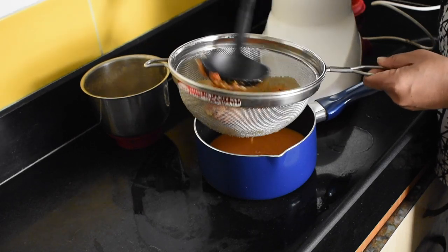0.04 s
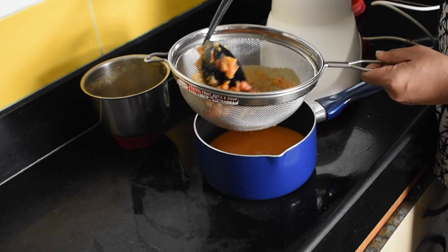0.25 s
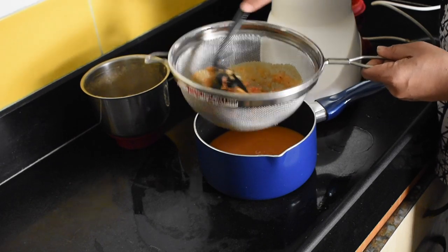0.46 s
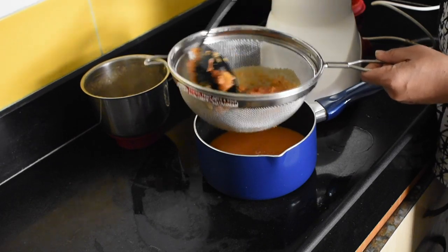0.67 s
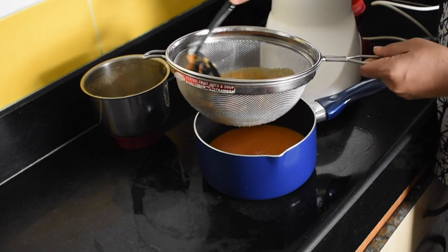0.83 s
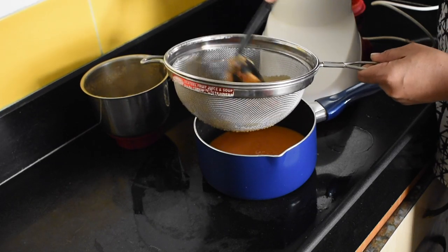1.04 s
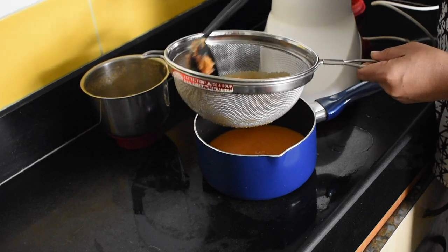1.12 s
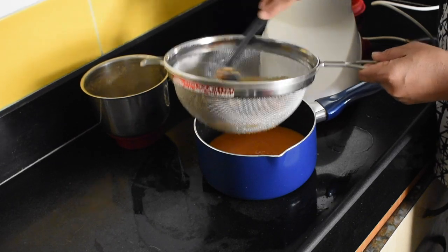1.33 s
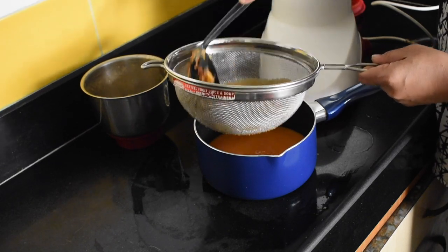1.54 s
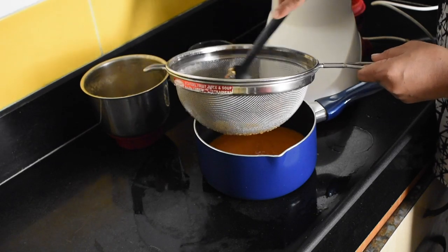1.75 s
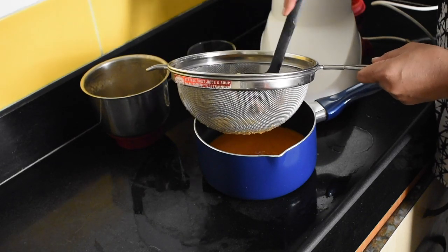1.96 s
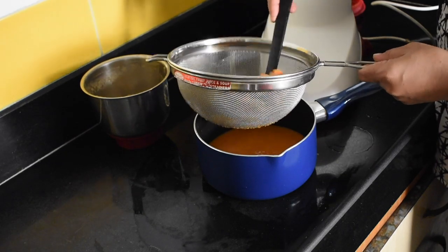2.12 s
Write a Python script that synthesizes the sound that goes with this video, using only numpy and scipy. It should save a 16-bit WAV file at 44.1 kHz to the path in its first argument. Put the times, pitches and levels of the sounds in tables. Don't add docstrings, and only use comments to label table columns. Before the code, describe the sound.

Spatula scraping a steel mesh strainer, heard close in a tiled kitchen. A knock, wet smack and hollow pan hum open it, fading by 0.2 s. A hard rasp comes at 0.55 s, a light drag near 0.8, a firm tick and scrape at 1.05, a bright scrape at 1.4, then nearly continuous rubbing from 1.75, easing by 2.2. Rough metallic tones, faint air and fridge hum.

```python
import sys
import numpy as np
from scipy import signal
from scipy.fft import rfft, irfft, next_fast_len
from scipy.io import wavfile
from scipy.ndimage import uniform_filter1d, map_coordinates

SR = 44100
rng = np.random.default_rng(int(sys.argv[2]) if len(sys.argv) > 2 else 0)


def boost_factor(decibels):
    exponent = np.asarray(decibels, float) / 20
    return 10 ** exponent


def transcribe(u):
    v = np.clip(np.atleast_2d(u).T, -1, 1)
    q = np.round(v * 32767).astype(np.int16)
    wavfile.write(sys.argv[1], SR, q)


N = 96402
CONTACT_RISE_S = .0007


def unit(x):
    return x / np.sqrt(np.mean(x ** 2) + 1e-20)


def along(points, hz):
    f, value = np.transpose(points)
    return np.interp(np.log(hz + 1), np.log(f + 1), value)


def wobble(rate):
    knots = rng.standard_normal(int(N * rate / SR) + 4)
    return map_coordinates(knots, [np.arange(N) * rate / SR])


def filtered(x, response):
    m = next_fast_len(N + SR // 2)
    return irfft(rfft(x, m) * response(np.fft.rfftfreq(m, 1 / SR)), m)[..., :N]


def modes(peaks, f):
    total = 0
    for k, (hz, width, db) in enumerate(peaks):
        damping = 1j * f * width
        total = total + (-1) ** k * boost_factor(db) * damping / (hz * hz - f * f + damping + 1e-9)
    return total


def patchy(x, patchy_db):
    z = signal.stft(x, nperseg=256)[2]
    field = uniform_filter1d(rng.standard_normal(z.shape), size=5, axis=0)
    field = uniform_filter1d(field, size=8, axis=1)
    return signal.istft(z * boost_factor(patchy_db * unit(field)), nperseg=256)[1][:N]


# f/Hz, level/dB per Hz
AIR = [(15, -26), (60, -24), (160, -18), (300, -6.5), (700, -5), (1900, -4), (2700, -12), (15800, -26.5)]
# f/Hz, level/dB
HUM = [(100, -80.5), (200, -77.5), (399, -68)]


def background():
    air_db, air_swell_db, air_patchy_db = -54.5, .5, .8
    hum_width_hz, hum_swell_db, hum_drift_rad = 12, 2.2, .8
    air = filtered(rng.standard_normal(N), lambda f: boost_factor(along(AIR, f)))
    air = unit(patchy(air, air_patchy_db))
    t = np.arange(N) / SR
    hum = np.zeros(N)
    for hz, db in HUM:
        level = boost_factor(db + hum_swell_db * wobble(hum_width_hz))
        phase = 2 * np.pi * hz * t + hum_drift_rad * wobble(hum_width_hz)
        hum += level * np.sqrt(2) * np.sin(phase)
    return boost_factor(air_db + air_swell_db * wobble(2.6)) * air + hum


# f/Hz, t60/s
KITCHEN = [(300, 0.48), (2000, 0.38), (6000, 0.11), (14000, 0.16)]


def kitchen(x):
    hz, t, z = signal.stft(rng.standard_normal(SR // 2), SR, nperseg=256)
    decay = boost_factor(-60 * t / along(KITCHEN, hz)[:, None])
    tail = signal.istft(z * decay, SR, nperseg=256)[1]
    delayed = np.pad(x, (200, 0))
    return signal.fftconvolve(delayed, tail / np.linalg.norm(tail))[:N]


def thump():
    hz, width_hz, level_db, rise_s, t60 = 270, 92, -44, 0.077, 0.38
    t = np.arange(N) / SR
    hollow = unit(filtered(rng.standard_normal(N), lambda f: modes([(hz, width_hz, 0)], f) ** 2))
    return boost_factor(level_db - 60 * t / t60) * (1 - np.exp(-t / rise_s)) * hollow


# t/s, peak level/dB, centre f/Hz, t60/s
SMACKS = [(.026, -33, 10900, 0.016), (0.036, -25, 11800, 0.025), (.225, -46, 9700, 0.036),
          (.487, -39, 8000, 0.16), (.525, -41, 13000, .03), (0.62, -20, 8600, 0.035),
          (0.762, -42, 4400, 0.031), (0.821, -40.5, 11100, 0.05), (.975, -46.5, 4950, 0.071),
          (.983, -42, 11000, .04), (1.019, -34.5, 4350, 0.04), (1.018, -35, 10100, 0.045),
          (1.068, -30.5, 2440, .03), (1.101, -23, 1910, 0.021), (1.242, -49, 7000, 0.061),
          (1.301, -44.5, 12000, 0.046), (1.545, -36, 9700, 0.035), (1.624, -48, 14100, .03),
          (1.639, -32, 10600, 0.05), (1.531, -35.5, 6800, 0.083), (2.032, -28, 2120, 0.06)]


def smacks():
    level_db, width, top_hz = -9.5, 0.77, 14500
    out, t = np.zeros(N + SR), np.arange(SR // 8) / SR
    f = np.fft.rfftfreq(len(t), 1 / SR) + 1
    for s, db, hz, t60 in SMACKS:
        band = np.exp(-(np.log(f / hz) / width) ** 2) / (1 + (f / top_hz) ** 20)
        burst = unit(irfft(rfft(rng.standard_normal(len(t))) * band, len(t)))
        envelope = boost_factor(db + level_db - 60 * t / t60) * (1 - np.exp(-t / CONTACT_RISE_S))
        out[round(s * SR):][:len(t)] += envelope * burst
    return out[:N]


# f/Hz, width/Hz, level/dB
TAP = [(1020, 230, -7), (1890, 190, 4.5), (3470, 420, -3.5), (5330, 260, -5)]


def knock():
    start_s, level_db, t60 = .0357, -32, 0.038
    out, t = np.zeros(N), np.arange(SR // 8) / SR
    ring = unit(filtered(rng.standard_normal(N), lambda f: modes(TAP, f)))[:len(t)]
    out[round(start_s * SR):][:len(t)] += boost_factor(level_db - 60 * t / t60) * ring
    return out


# t/s, peak level/dB
TICKS = [
    (.759, -44.5),
    (.976, -52),
    (1.019, -37),
    (1.066, -43),
]
# f/Hz, level/dB, t60/s
STEEL = [(2970, -5, .04), (3600, -17, 0.032), (4160, -8, .04), (4610, 0.5, 0.031), (5440, -10, .05)]


def ticks():
    out, t = np.zeros(N + SR), np.arange(SR // 10) / SR
    for s, db in TICKS:
        ring = np.zeros(len(t))
        for hz, level, t60 in STEEL:
            ring += boost_factor(level - 60 * t / t60) * np.sin(2 * np.pi * (hz * t + rng.random()))
        out[round(s * SR):][:len(t)] += boost_factor(db) * (1 - np.exp(-t / CONTACT_RISE_S)) * ring
    return out[:N]


# t/s, length/s, f/Hz, level/dB
SINGS = [(0.534, 0.039, 1590, -38.8), (0.534, 0.046, 710, -39), (0.564, 0.086, 710, -42.5),
         (0.576, 0.11, 1690, -44.5), (0.581, 0.037, 4220, -42), (0.584, 0.057, 1430, -40),
         (0.584, 0.096, 4110, -49), (0.589, 0.041, 4930, -45), (0.594, 0.061, 1800, -36.5),
         (0.594, 0.055, 3450, -43), (0.594, 0.065, 2760, -43.5), (0.601, 0.068, 3550, -45.4),
         (1.053, 0.075, 1890, -39), (1.058, 0.053, 2940, -44), (1.065, 0.041, 1680, -37.5),
         (1.065, 0.068, 5510, -49), (1.078, 0.041, 3050, -49), (1.085, 0.064, 2700, -45),
         (1.399, 0.059, 4630, -45), (1.399, 0.07, 5180, -49.3), (1.402, 0.085, 1600, -38.5),
         (1.404, 0.031, 1800, -36.5), (1.417, 0.041, 1010, -39.5), (1.419, 0.056, 5070, -46),
         (1.424, 0.059, 4710, -44), (1.424, 0.064, 4110, -40.5), (1.429, 0.075, 4010, -49),
         (1.432, 0.07, 2720, -43.5), (1.442, 0.059, 720, -39), (1.457, 0.066, 1480, -43),
         (1.462, 0.022, 3040, -42), (1.462, 0.031, 1810, -37), (1.768, 0.046, 870, -39.5),
         (1.768, 0.13, 2760, -46.5), (1.778, 0.049, 1420, -38.9), (1.788, 0.029, 990, -35),
         (1.796, 0.069, 1810, -39.7), (1.801, 0.096, 710, -40), (1.816, 0.14, 2350, -46.5),
         (1.818, 0.03, 1690, -37), (1.823, 0.075, 1840, -47), (1.883, 0.044, 1480, -44),
         (2.013, 0.074, 2130, -49), (2.015, 0.036, 710, -40), (2.028, 0.089, 2000, -42.8),
         (2.058, 0.098, 1990, -48),
         (.685, 0.039, 850, -51.5), (0.816, 0.049, 1340, -50), (0.913, 0.056, 1320, -53),
              (1.1, 0.034, 714, -44.5), (1.477, 0.029, 728, -38), (1.891, 0.08, 704, -47),
              (2.013, 0.093, 292.3, -57), (2.033, 0.067, 1000, -44.5), (1.065, 0.0094, 1860, -38.5)]


def singing():
    level_db, flutter_db, flutter_per_s = -1.5, 3.5, 130
    edge_share = 0.4
    drift_rad = 1.05
    out, t = np.zeros(N + SR), np.arange(SR // 5) / SR
    flutter, drift = wobble(flutter_per_s), wobble(flutter_per_s)
    for s, length, hz, db in SINGS:
        u = rng.random()
        start = int(u * (N - len(t)))
        take = slice(start, start + len(t))
        edge = np.clip(np.minimum(t, length - t) / (edge_share * length), 0, 1)
        phase = 2 * np.pi * (hz * t + u) + drift_rad * np.cbrt(hz / 1e3) * drift[take]
        level = boost_factor(db + level_db + flutter_db * flutter[take])
        out[round(s * SR):][:len(t)] += level * np.sin(edge * np.pi / 2) * np.sqrt(2) * np.sin(phase)
    return out[:N]


def catches():
    per_s, spread_db, shudder_db, shudder_per_s = 14000, 1.6, 1, 160
    snap = rng.random(N) < per_s / SR
    size = rng.standard_normal(N) * boost_factor(spread_db * rng.exponential(size=N))
    return unit(snap * size * boost_factor(shudder_db * wobble(shudder_per_s)))


# t/s, pressure level/dB, slide speed as hiss over bowl/dB, fine wires favoured/dB
EARLY = [
    [(-.02, -43, -13, -1), (.03, -54.5, 0, -3.5), (.038, -44.5, 1.5, -8), (.056, -54, -1.5, -1),
     (.12, -60, -5, -6), (.2, -75, 5, 5)],
    [(.526, -60, 15, -10), (.541, -31.5, -15.5, 5), (.553, -34.5, -8.5, -3), (.572, -46.5, -4, -1),
     (.595, -32.5, -1, -2), (.615, -37, 3, -2), (.645, -42.5, 2.5, 3), (.672, -55.5, 7, -4.5),
     (.75, -64.5, 2.5, -4.5)],
    [(.74, -53.5, -6.5, 2), (.8, -50.5, -13, 1), (.83, -54, -12, -3), (.9, -54.5, -18, 0),
     (.99, -53, -8.5, 5), (1.025, -56, -1, 1)],
    [(1.015, -47, -4, 0), (1.034, -39, -18, 4), (1.056, -37, -10.5, -1), (1.066, -39, -6, 0),
     (1.069, -32.5, -7, -2.5), (1.1, -39.5, -0.5, -5.5), (1.125, -42.5, -3, -4), (1.2, -77.5, 11, -13),
     (1.27, -72, 2, -7)],
]
# t/s, pressure level/dB, slide
# speed as hiss over bowl/dB, fine wires favoured/dB
LATE = [
    [(1.382, -75, 9, 1), (1.397, -45, 9, 0.5), (1.408, -40.5, 3.5, 10.5), (1.413, -35, -2, 1),
     (1.445, -34.5, -1.5, -1.5), (1.478, -35, -3.5, -5), (1.51, -51, 3, -5), (1.55, -64.5, 7.5, -8.5),
     (1.6, -72.5, 13, -2)],
    [(1.6, -62.5, 2, -5), (1.7, -55, -8, 1.5), (1.752, -46.5, -7.5, 1.5), (1.782, -35, -3, -3),
     (1.806, -29.5, -9, -1), (1.835, -37, -2, 1), (1.865, -37.5, -5.5, -1)],
    [(1.865, -38, -6, 2), (1.9, -38, -5.5, -1.5), (1.93, -38.5, -3.5, -3), (1.97, -46, -1.5, -4.5),
     (2.0, -40.5, -6, -6.5)],
    [(2.0, -48, 8, 8), (2.016, -40.5, -3, -2.5), (2.034, -34.5, -6, 4), (2.05, -42.5, 2.5, -1.5),
     (2.09, -43, -2, -1), (2.166, -50, -6.5, -1), (2.19, -56, 6.5, -4.5)],
]
# favoured bowl f/Hz, lift/dB, blade note f/Hz, lift/dB, belly lift/dB
BLADE = [(1000, 1, 1300, 1.5, 3), (645, 1.5, 1450, -0.5, 5), (820, -1, 1380, 8, -6), (780, 1, 2210, 7, -13),
         (983, 9, 2000, 2.5, -3), (990, 6.5, 1400, 5, -17), (670, -5, 2200, 4, 3.5), (716, 9, 2380, 19, 0)]
# f/Hz, width/Hz, level/dB
BOWL = [(355, 54, -10.5), (510.4, 26.4, -7), (596, 62, -7.5), (729, 85, -1.5), (870, 11.7, -1.5),
        (1015, 31, 2), (1182, 73, -10.5), (1420, 26, 2.5), (1604, 39, -1.5), (1648, 24, -4),
        (1770, 70, -3.5), (1976, 68, 1.5), (2283, 50, -17), (2720, 36, -3)]
# f/Hz, level/dB per Hz
DULL = [(120, -106), (200, -9.5), (356, -22), (692, 5), (1280, 6.5), (1840, 7.5), (2160, -7), (4000, -74),
        (5200, -110), (8800, -120)]
# f/Hz, level/dB per Hz
MESH = [(1290, -63), (2200, -5), (3760, -2), (4080, -2.5), (5680, -5), (8370, -3.5), (13800, -10.5),
        (15800, -22)]
# f/Hz, width/Hz, level/dB
WIRES = [(4133, 16.7, -32), (4540, 37, 27), (4767, 53, -13), (5390, 30, 29)]


def scraping():
    bowl_level_db, dull_level_db, wires_db = -3, -7, -13
    wander_db, patchy_db = 2, 1.5
    touch_s, damped_hz = .012, 32
    belly_hz, fine_hz = 372, 6300
    bearing_octaves = 0.18
    t, out = np.arange(N) / SR, np.zeros(N)
    damped = [(hz, max(width, damped_hz), db) for hz, width, db in BOWL]

    def near(f, hz):
        return np.exp(-(np.log2((f + 1) / hz) / bearing_octaves) ** 2)

    for rows, (bowl_hz, bowl_db, blade_hz, blade_db, belly_db) in zip([*EARLY, *LATE], BLADE):
        s, *controls = np.transpose(rows)
        press, speed, fine = [boost_factor(np.interp(t, s, c)) for c in controls]
        press = press * np.clip((t - s[0]) / touch_s, 0, 1)
        press = press * np.clip((s[-1] - t) / touch_s + 1, 0, 1)
        force = catches()

        def blade(f):
            lift = bowl_db * near(f, bowl_hz) + blade_db * near(f, blade_hz)
            return boost_factor(lift + belly_db * near(f, belly_hz))

        def ring(f):
            return modes(damped, f) * blade(f)

        def dull(f):
            return boost_factor(along(DULL, f)) * blade(f)

        def rms(response):
            return np.sqrt(np.mean(filtered(force, response) ** 2))

        out += boost_factor(bowl_level_db) * patchy(filtered(press * force, ring), wander_db) / rms(ring)
        out += boost_factor(dull_level_db) * filtered(press * force, dull) / rms(dull)

        hiss = unit(patchy(filtered(force, lambda f: boost_factor(along(MESH, f))), patchy_db))
        hiss = hiss + boost_factor(wires_db) * unit(filtered(force, lambda f: modes(WIRES, f)))
        high = filtered(hiss, lambda f: 1 / (1 + (fine_hz / (f + 1)) ** 4))
        out += press * speed * ((hiss - high) / fine + high * fine)
    return out


def scene():
    room_db, sung_room_db = -6, -7
    floor = background()
    near = thump() + smacks() + knock() + ticks() + scraping()
    sung = singing()
    reverberant = kitchen(near + boost_factor(sung_room_db) * sung)
    return (near + sung + boost_factor(room_db) * reverberant + floor)[None]


def low_pass(x):
    return signal.sosfilt(signal.butter(12, 16430, fs=SR, output="sos"), x)


def record(dry):
    top_hz = 15830
    mix = filtered(dry, lambda f: f < top_hz)
    return low_pass(mix)


dry = scene()
out = record(dry)
transcribe(out)
```